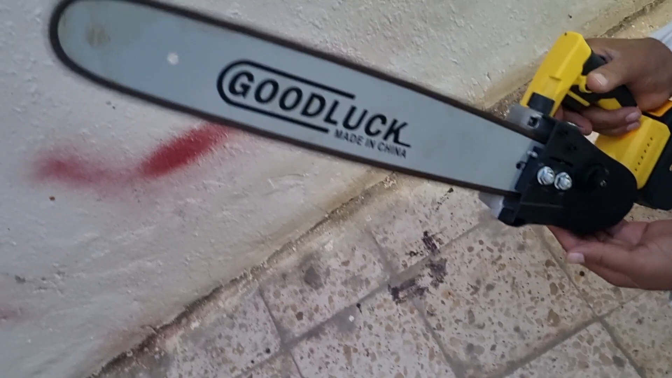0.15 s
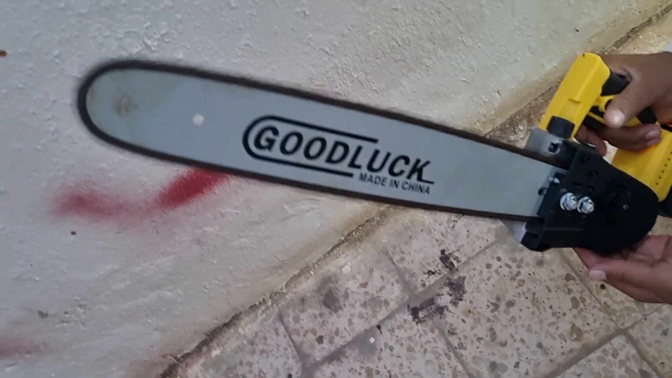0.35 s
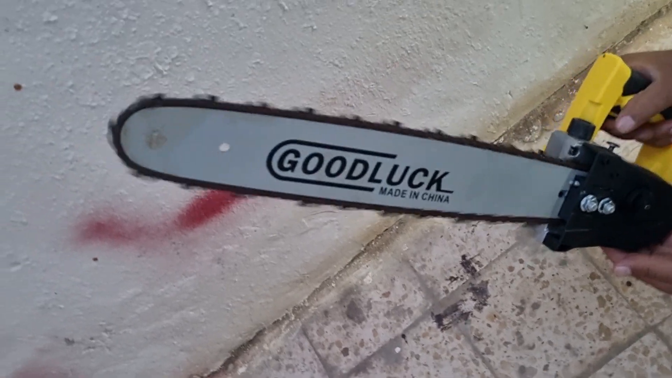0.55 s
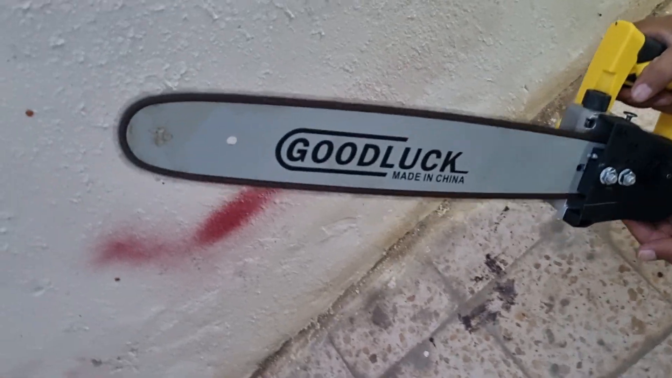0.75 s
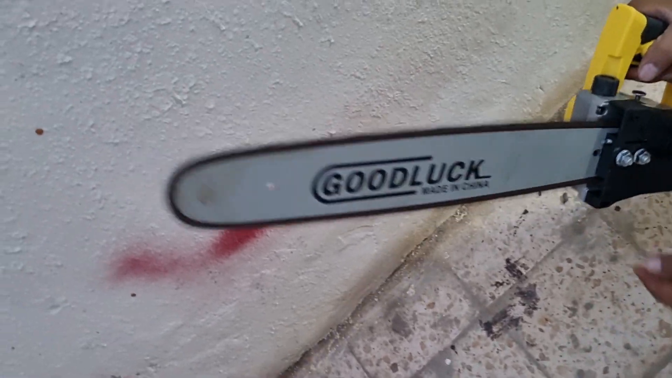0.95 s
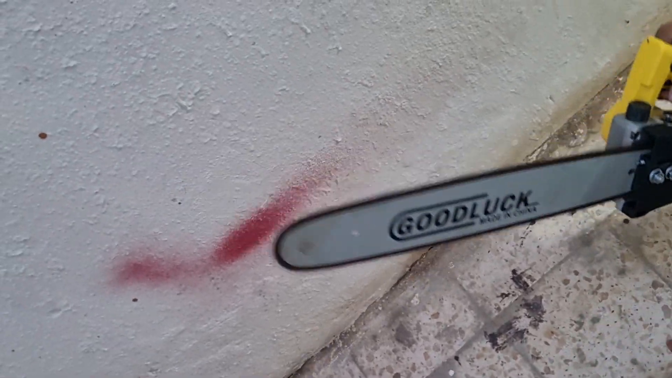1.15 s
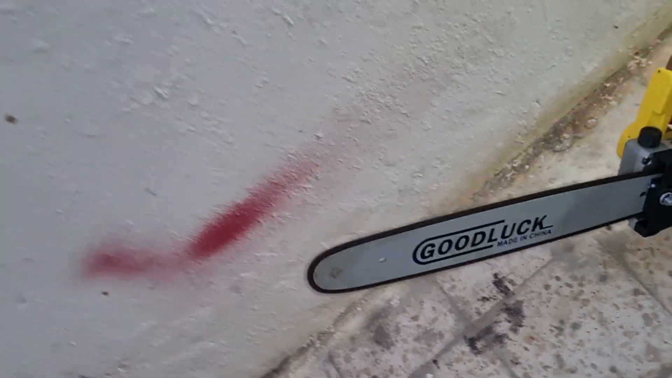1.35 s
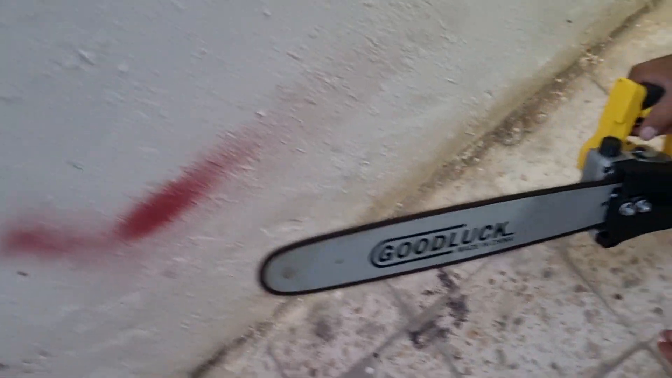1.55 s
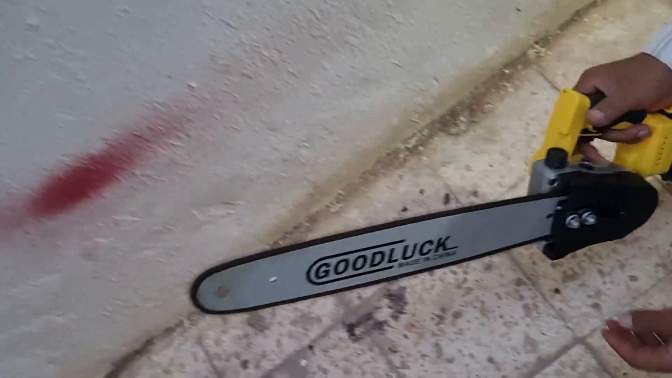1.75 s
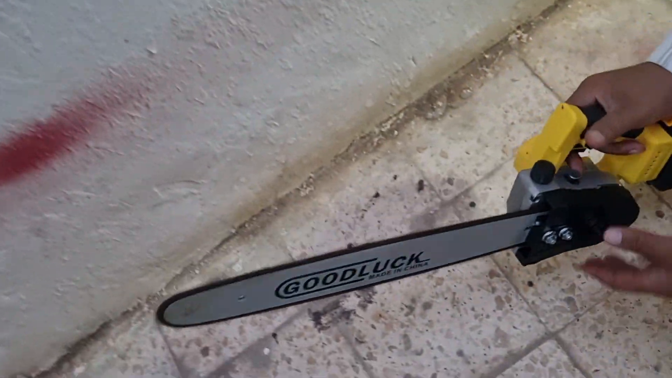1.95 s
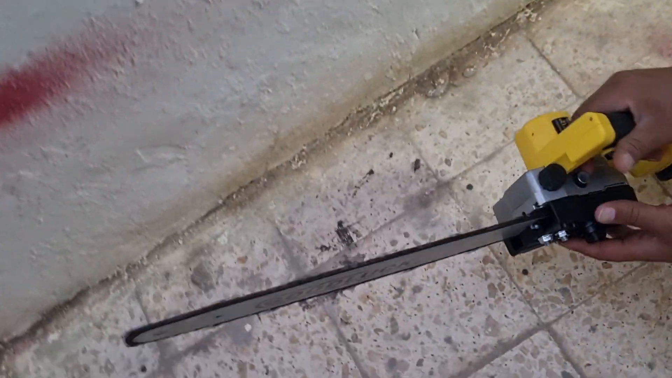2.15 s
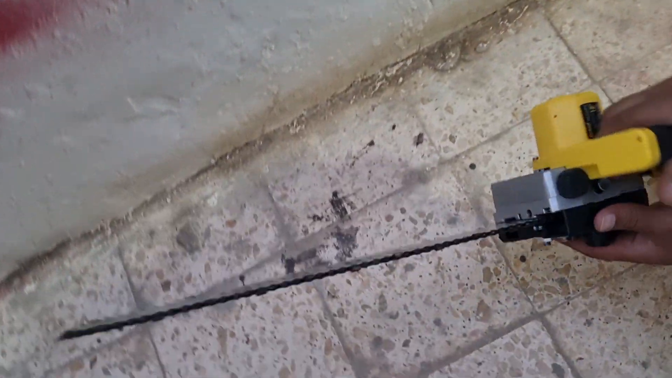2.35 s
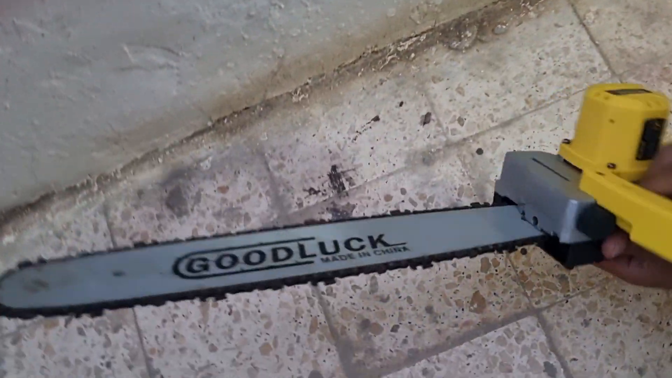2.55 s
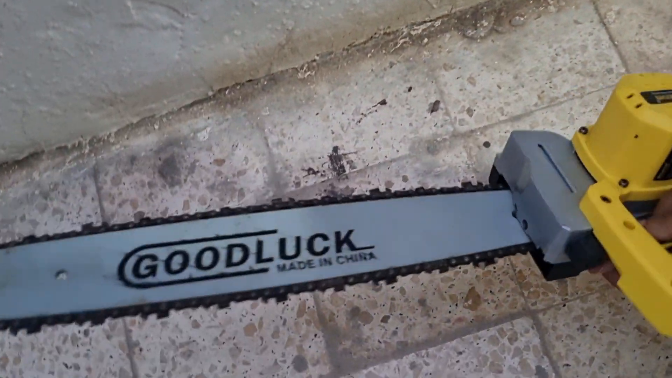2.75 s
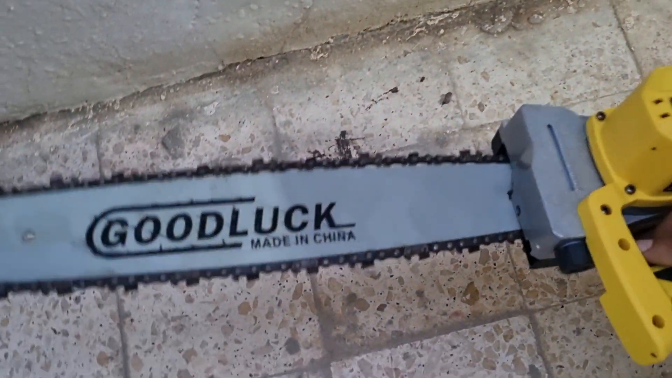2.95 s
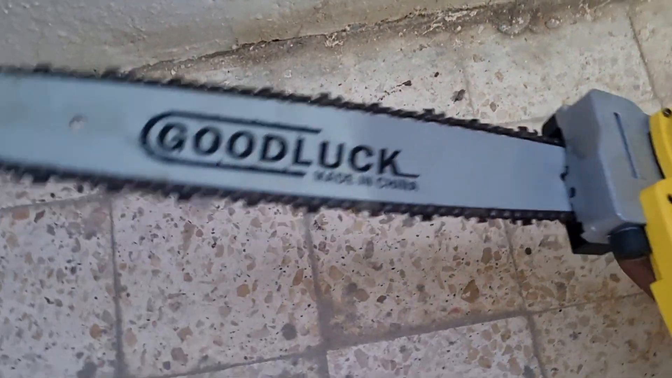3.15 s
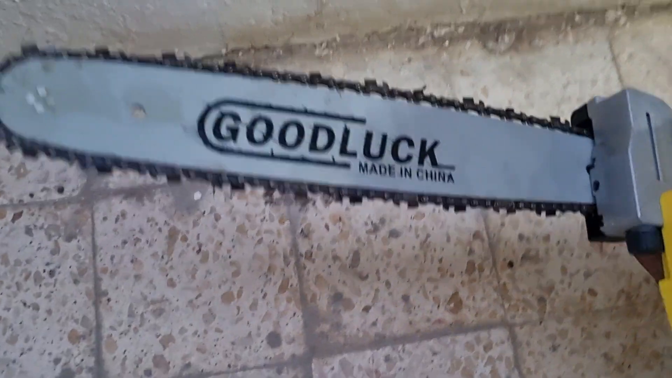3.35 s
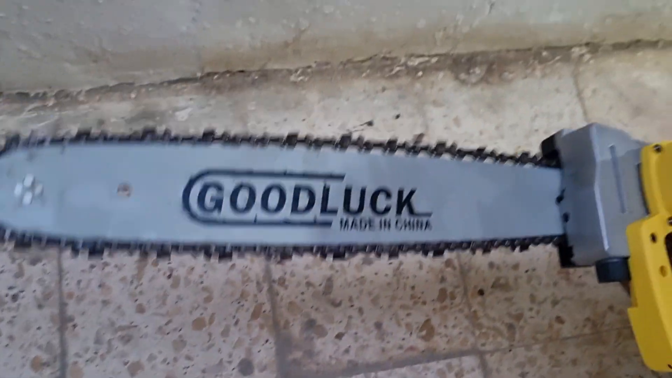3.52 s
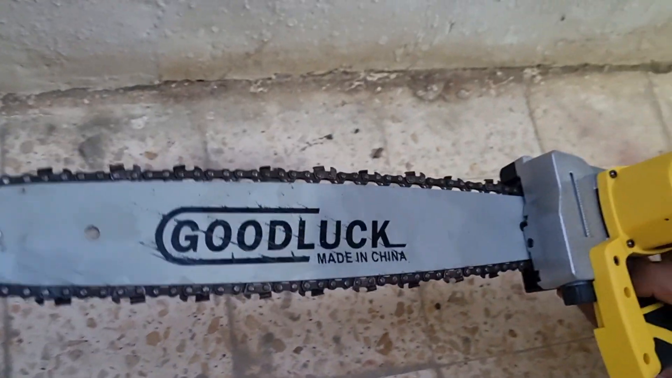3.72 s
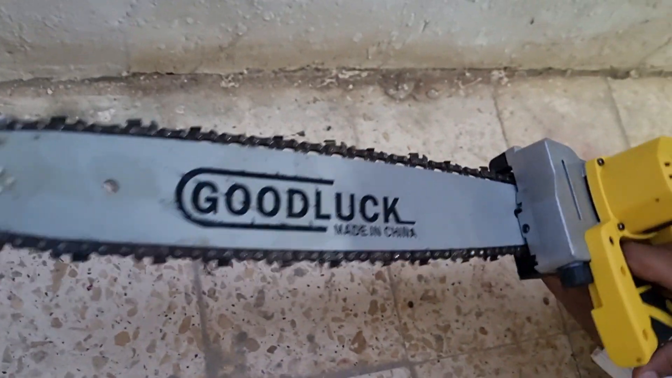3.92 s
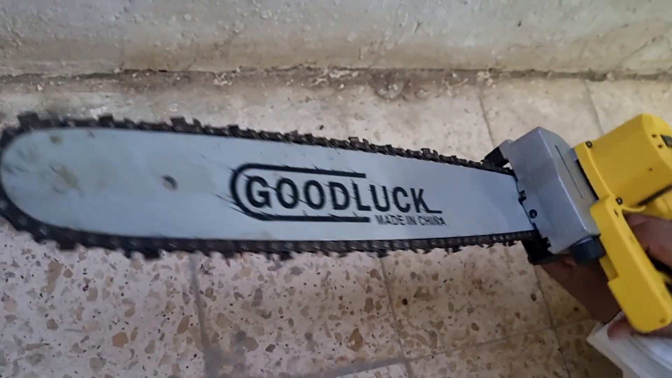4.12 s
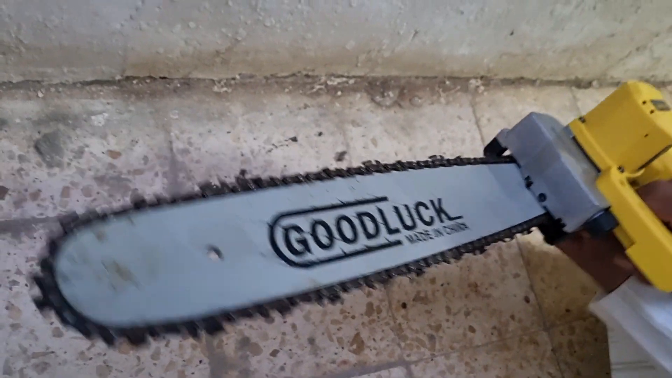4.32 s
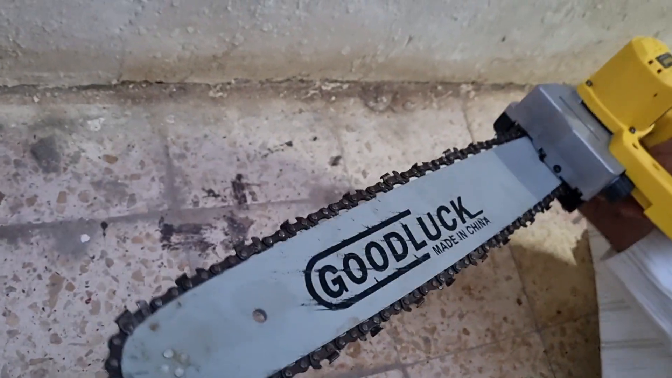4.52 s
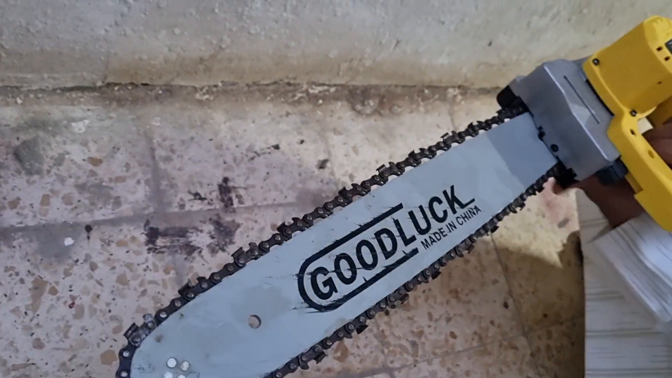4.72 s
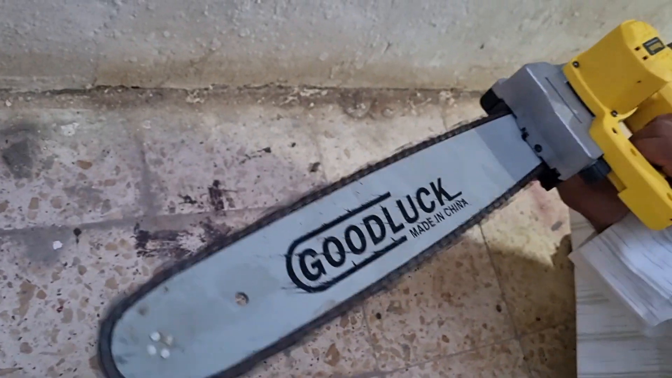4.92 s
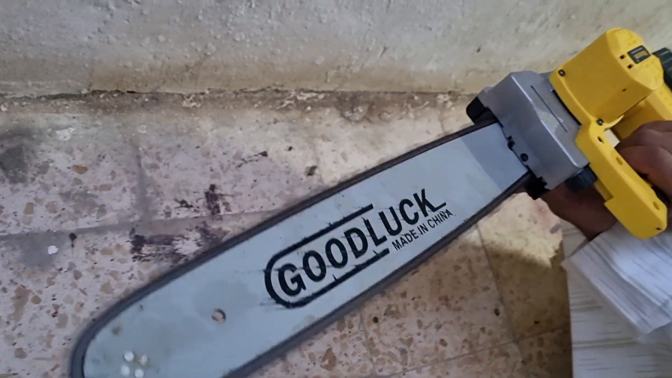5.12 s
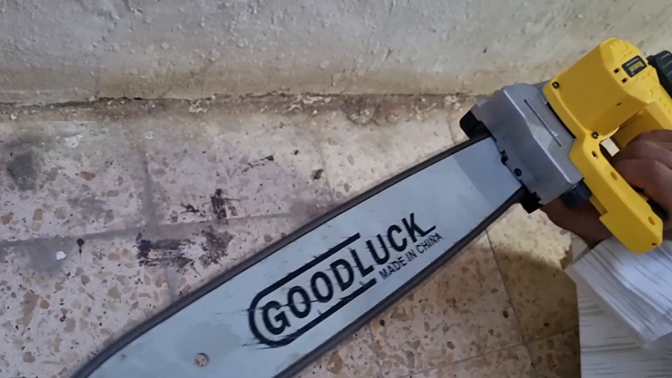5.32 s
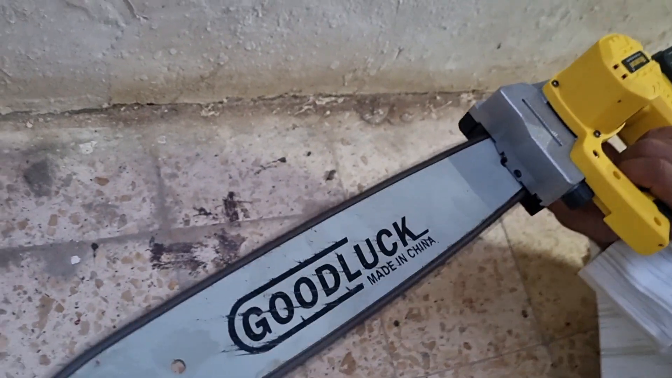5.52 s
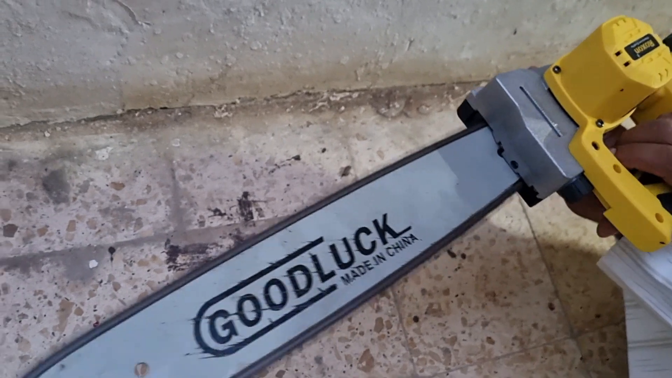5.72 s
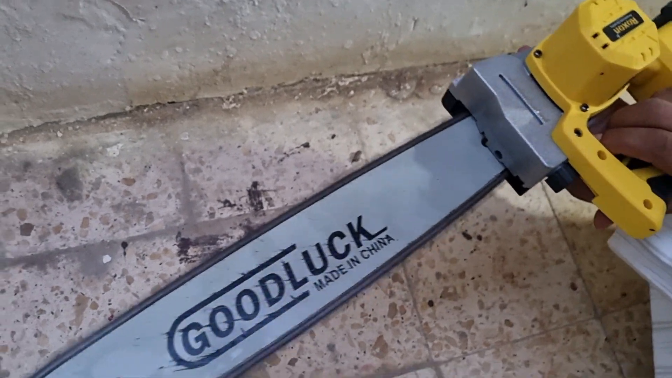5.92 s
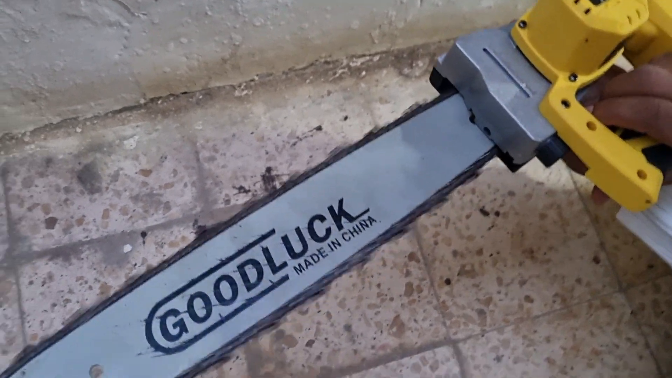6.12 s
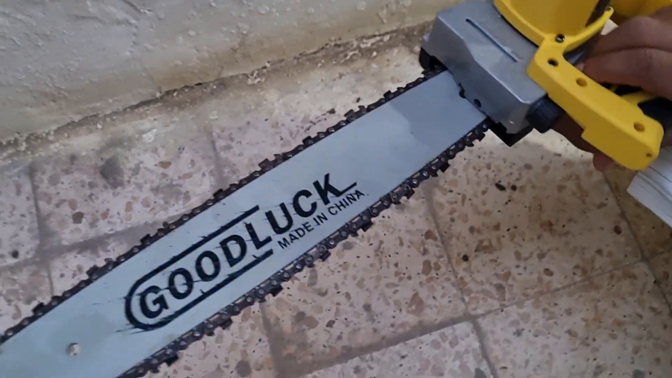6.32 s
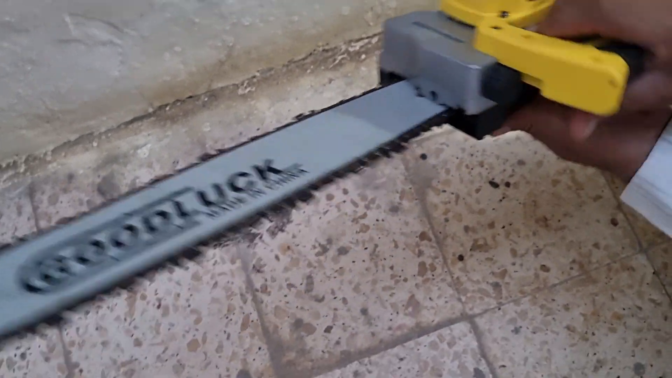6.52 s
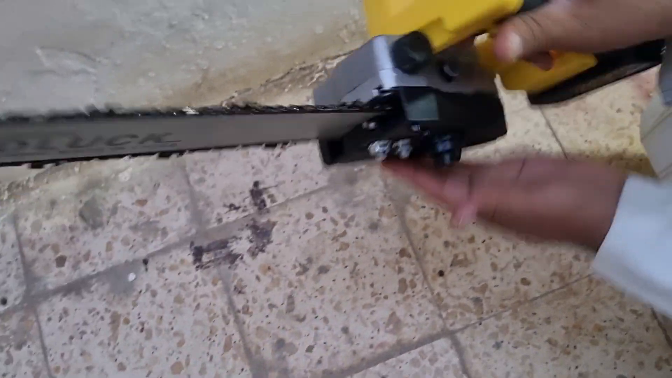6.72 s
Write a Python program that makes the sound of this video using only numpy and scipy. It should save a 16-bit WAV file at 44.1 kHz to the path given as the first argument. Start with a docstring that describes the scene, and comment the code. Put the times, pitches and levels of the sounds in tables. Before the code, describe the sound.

Close to the microphone, an electric chainsaw spins its chain freely in three short bursts, each a hissing metallic rattle that slows and dulls as it coasts. The first two come back to back, with the slack chain clacking against the bar. A quiet gap of faint hand rubbing and plastic clicks comes before the third. A tiled floor and wall add slight reverberation, and a distant machine hums low throughout.

```python
"""A cordless chainsaw rattles freely in three trigger bursts, close to a stereo pair over a tiled floor.
The first burst is already running. Links strike the sprocket and the steel bar over a faint gear whine,
then coast down; the slack chain clacks and sets the bar ringing. Before the last burst the saw is
turned from cover up to motor up: hands rustle, trigger and housing click. Wall and tiles return a
short tail, and a distant machine hums low in the room."""
import sys
import numpy as np
from scipy import signal
from scipy.fft import rfft, irfft
from scipy.io import wavfile
from scipy.ndimage import uniform_filter1d

SR = 44100
rng = np.random.default_rng(int(sys.argv[2]) if len(sys.argv) > 2 else 0)


def store_pcm(level_fs):
    """Save levels as 16-bit WAV."""
    pcm = np.round(np.clip(level_fs, -1, 1) * 32767).astype(np.int16)
    wavfile.write(sys.argv[1], SR, np.atleast_2d(pcm).T)


N = 298557
TIME = np.arange(N) / SR
TURN_S = 3  # from here on the saw lies motor up

# trigger bursts: press t/s, release t/s, top shaft speed/(turns/s), spin-up time constant/s, coast/s,
# rattle level/dB, low clatter/dB and hiss/dB against the mid band, lift of the bar's ring/dB
BURSTS = [(-1.5, .06, 238, .3, .615, -19, -6.4, -.1, -2.3), (.62, 1.73, 249, .315, .62, -19.8, -9, .2, .5),
          (4.92, 5.64, 246, .205, .61, -18.6, -9.3, 2, 0)]
# slack chain on the sprocket: t/s, relative level/dB, decay/s, tilt/(dB/octave), main ring f/Hz
CLACKS = [(.630, -25.5, .0055, 9, 4500), (2.076, -22.5, .008, 12, 5000), (2.324, -47, .004, 1, 3200),
          (2.339, -42.5, 0.009, -7.5, 4450), (2.364, -43, .006, -9.5, 4600), (2.381, -51, .004, -10, 1600),
          (2.398, -52, 0.008, -9, 4500), (4.920, -37, .005, 4, 2400), (4.927, -29.5, .025, -1, 2200),
          (4.942, -23, .003, 10.5, 2400), (6.241, -45, .0015, 5, 12000), (6.2586, -34.5, 0.003, -2, 4600),
          (6.2902, -37.5, 0.0028, -1.5, 4850)]


def amp(db):
    """Decibels to gain."""
    return 10 ** (np.asarray(db) / 20)


def unit(x):
    """Scales to rms 1."""
    return x / np.sqrt(np.mean(x ** 2) + 1e-20)


def by_hz(points, hz, column=1):
    """Reads one column of a table on a log-frequency axis."""
    points = np.asarray(points, float)
    return np.interp(np.log(hz + 1), np.log(points[:, 0] + 1), points[:, column])


def by_burst(t):
    """The columns of the latest burst at each time."""
    rows = np.asarray(BURSTS, float)
    return rows[np.searchsorted(rows[:, 0], t) - 1].T


def peak(hz, centre, width):
    """Bell of a resonance, 1 at its centre."""
    return 1 / (1 + (2 * (hz - centre) / width) ** 2)


def wander(cutoff_hz):
    """Smooth random drift of rms 1."""
    hz = np.fft.rfftfreq(N, 1 / SR)
    return unit(irfft(rfft(rng.standard_normal(N)) / (1 + (hz / cutoff_hz) ** 4), N))


def coloured(x, points, tilt_db=0, ring_hz=1000, ring_db=0):
    """Filters by a tilted spectrum with one resonance raised."""
    hz = np.fft.rfftfreq(x.shape[-1], 1 / SR)
    octaves = np.log2((hz + 500) / 4000)
    gain = amp(by_hz(points, hz) + tilt_db * octaves + ring_db * peak(hz, ring_hz, 800))
    return irfft(rfft(x) * unit(gain), x.shape[-1])


def paired(z, coherence):
    """Makes two unrelated spectra partly alike, as at the left and right microphones."""
    return np.array([z[0], coherence * z[0] + np.sqrt(1 - coherence ** 2) * z[1]])


def shaft_speed(coast_curve=1.17):
    """Turns per second: the motor climbs while the trigger is held, then friction slows it to rest."""
    speed = np.zeros(N)
    for press, release, top, spin_up, coast, *_ in BURSTS:
        start = np.interp(press, TIME, speed)
        driven = start + (top - start) * np.tanh((np.minimum(TIME, release) - press) / spin_up)
        coasting = np.clip(1 - (TIME - release) / coast, 0, 1) ** coast_curve
        speed = np.where(TIME < press, speed, driven * coasting)
    return speed


def load(speed, full_turns_per_s2=282):
    """Pull on the chain, 0-1, from the shaft's acceleration."""
    return np.clip(uniform_filter1d(np.gradient(speed) * SR, size=3000) / full_turns_per_s2, 0, 1)


def links(speed, links_per_turn=2, spread_db=3, ring_s=.0008, slide=.85, slap_db=.66, tick_db=-9):
    """Each drive link strikes sprocket and bar nose; between strikes the chain slides in its groove."""
    passed = np.cumsum(speed * links_per_turn) / SR
    strikes = np.zeros(N)
    for place in (0, .5):
        crossing = np.diff(np.floor(passed + place + .12 * wander(300)), prepend=0) > 0
        strikes += crossing * amp(spread_db * rng.uniform(-1, 1, N))
    force = signal.lfilter([1], [1, -np.exp(-1 / (ring_s * SR))], strikes) + slide
    # tight and slack stretches come round with each lap of the chain
    force *= (1 + .06 * np.sin(2 * np.pi * passed / 16)) * amp(slap_db * wander(70))
    force /= np.sqrt(uniform_filter1d(force ** 2, size=2205))
    # cutters nick the rails: a dense fizz at full speed, separate ticks as the chain slows
    tick_rate = 9 * (speed + 20) * (speed / speed.max() + .1)
    ticks = (rng.random(N) < tick_rate / SR) * rng.choice([-1, 1], (2, N)) * np.sqrt(SR / tick_rate)
    return force * (rng.standard_normal((2, N)) + amp(tick_db) * ticks)


def flares(t, hz):
    """Brief swells of single resonances of the rattle, in dB over frames and bins."""
    # t/s, half length/s, f/Hz, width/Hz, lift/dB
    swells = [(1.03, .08, 4600, 900, 3), (1.46, .14, 4970, 260, 8), (1.68, .09, 3900, 700, 3),
              (1.74, .13, 1130, 300, 6), (5.17, .06, 1430, 260, 8), (5.42, .15, 4110, 200, 3.5),
              (5.93, .14, 4700, 500, 4.5)]
    return sum(db * np.outer(np.exp(-((t - s) / length) ** 2), peak(hz, f, width))
               for s, length, f, width, db in swells)


def burst_colour(t, hz, body, bar_hz=5200, bar_width_hz=2200):
    """Each burst's own share of clatter, hiss and bar ring, in dB, with the mid band as reference."""
    *_, clatter, hiss, bar = by_burst(t)
    bands_hz = [(700, 1800), (1800, 6000), (7000, 15500)]
    low, mid, high = (20 * np.log10(np.linalg.norm(body[(hz > a) & (hz < b)])) for a, b in bands_hz)
    clatter_db = np.outer(clatter - low + mid, by_hz([(1400, 1), (2200, 0)], hz))
    hiss_db = np.outer(hiss - high + mid, by_hz([(5000, .0022), (8000, .85)], hz))
    bar_db = np.outer(bar, peak(hz, bar_hz, bar_width_hz))
    return clatter_db + hiss_db + bar_db - mid


def speed_colour(t, hz, speed, coast_ring_db):
    """Change of the rattle in dB: louder under pull, duller and more ringing as the chain coasts."""
    # lift from the pull of the accelerating motor: f/Hz, level/dB
    pull_colour = [(300, 1.5), (1000, 1), (1500, 2.8), (1900, 1.5), (2400, 4.5), (4600, 3.4), (8000, 1.9),
                   (15000, 1.9)]
    # change as the chain nears rest: f/Hz, level/dB
    slow_colour = [(300, .5), (1300, .3), (2600, -1), (4600, -1.6), (8000, -5.2), (15000, -5.4)]
    # bands in which the loaded sprocket shakes the chain: multiple of shaft rate, width/Hz, lift/dB
    growl = [(8.3, 220, 2.5), (14, 220, 6)]
    shaft_hz = np.interp(t, TIME, speed)[:, None]
    pull = np.interp(t, TIME, load(speed))[:, None]
    pace = shaft_hz / speed.max()
    growl_db = pull * pace * sum(db * peak(hz, k * shaft_hz, width) for k, width, db in growl)
    pull_db = pull * pace ** .17 * by_hz(pull_colour, hz)
    slow_db = (1 - pace) * (by_hz(slow_colour, hz) + (1 - pull) * coast_ring_db)
    return growl_db + pull_db + slow_db


def rattle(drive, speed, colour, modes, image, gain_db, patchy_db, coast_ring, settle_turns_per_s=15):
    """Link strikes ring bar and housing, louder with speed, as heard from one side of the saw."""
    hz, t, z = signal.stft(drive, SR, nperseg=1024, noverlap=768)
    coherence, phase, balance_db = (by_hz(image, hz, column) for column in (1, 2, 3))
    z = paired(z.transpose(0, 2, 1), coherence)
    z *= np.array([amp(balance_db / 2), amp(-balance_db / 2) * np.exp(-1j * phase)])[:, None]
    ring_db = sum(db * peak(hz, f, width) for f, width, db in modes)
    body = amp(by_hz(colour, hz) + ring_db)
    z *= body / np.sqrt(np.mean(abs(z) ** 2, (0, 1)))
    z *= amp(burst_colour(t, hz, body) + speed_colour(t, hz, speed, coast_ring * ring_db))
    # the whipping chain shifts energy between resonances
    patches = uniform_filter1d(rng.standard_normal(z.shape[1:]), size=12, axis=0)
    patches = unit(uniform_filter1d(patches, size=5, axis=1))
    z *= amp(patchy_db * patches + flares(t, hz))
    sound = signal.istft(z.transpose(0, 2, 1), SR, nperseg=1024, noverlap=768)[1][:, :N]
    jumping = speed ** 2 / (speed ** 2 + settle_turns_per_s ** 2)  # slow links only slide
    _, _, top_speed, _, _, burst_db, *_ = by_burst(TIME)
    return sound * jumping * amp(burst_db + gain_db) * (speed / top_speed) ** .94


def chain(speed):
    """The running chain, close to the microphones: first sprocket cover up, then motor up."""
    # broad spectrum of the rattle from each side: f/Hz, relative level/dB
    cover_colour = [(100, -35.5), (300, -21), (600, -19.5), (1000, -10.5), (1300, -8), (1850, -1.4),
                    (2800, .7), (4000, .3), (5200, .8), (6500, -4), (8500, -9), (10500, -9.3), (12500, -5),
                    (15800, -8.7)]
    motor_colour = [(100, -21), (300, -25), (600, -19.5), (850, -9), (1250, -9), (2200, 1), (3000, 6),
                    (4600, 4), (6500, -6), (8500, -16.5), (10500, -15.5), (12000, -11.5), (15800, -15.5)]
    # resonances of bar and housing from each side: f/Hz, width/Hz, lift/dB
    cover_modes = [(761, 60, 7), (970, 44, 3.5), (1490, 36, 12), (1623, 60, 7), (2056, 110, 5.7),
                   (3090, 270, 2.3), (4000, 100, 4.5), (5010, 190, 1), (5820, 280, -3), (9250, 400, 1.5)]
    motor_modes = [(816, 63, 5.8), (990, 35, 4.5), (1480, 33, 2), (1640, 60, 7), (2015, 125, 10.5),
                   (2325, 45, 4), (2450, 60, 4.5), (2890, 90, 3.2), (3835, 93, 5.4), (4130, 140, 7),
                   (4950, 270, 1.5), (5260, 200, 2.5), (9300, 340, 3.3)]
    # each side at the microphone pair: f/Hz, coherence, left lead/rad, left minus right/dB
    cover_image = [(300, 0.18, -0.5, -6), (550, 0.98, -1.6, -0.5), (998, .5, -1.6, -6.5),
                   (1500, 0.75, -2.5, -3), (2270, 0.89, -3.5, -3.5), (2830, .3, -4.5, -6),
                   (3560, 0.588, -4, -4), (4860, .5, -5, -6), (7200, 0.23, -5, 1), (11500, .12, -4.5, -6.5),
                   (15000, .05, -3.5, -3.5)]
    motor_image = [(300, 0.59, -2, 0), (750, 0.27, -0.4, -8), (1080, 0.31, -1.5, -3.5),
                   (1363, 0.22, 2.9, -4), (1600, 0.19, 1, -2), (1890, 0.52, .65, -3), (2360, 0.65, 0, -3.5),
                   (2960, 0.55, 2, -5), (4300, 0.62, 2.5, -7.5), (5430, 0.41, 2.5, -1.5),
                   (7960, 0.33, 1.1, 2), (12000, 0.26, 1, -7), (15000, .1, 2, -3.5)]
    drive = links(speed)
    cover_up = rattle(drive, speed, cover_colour, cover_modes, cover_image,
                      gain_db=1, patchy_db=1.7, coast_ring=.21)
    motor_up = rattle(drive, speed, motor_colour, motor_modes, motor_image,
                      gain_db=0, patchy_db=1.5, coast_ring=.4)
    return np.where(TIME < TURN_S, cover_up, motor_up)


def motor(speed, flutter=.004, rough=.7, strain_db=11):
    """Unbalance hums near full speed; the gears whine loudest while they pull the chain up to speed."""
    # shaft unbalance: multiple of shaft rate, level/dB at full speed with the cover up
    unbalance = [(1, -45), (2, -48), (4, -51)]
    # gear mesh: multiple of shaft rate, relative level/dB cover up, relative level/dB motor up
    gears = [(8, -47, -45), (11, -47, -47), (14, -37.5, -44), (17, -39.5, -39), (21, -42, -48),
             (26, -42, -50)]
    turns = np.cumsum(speed * (1 + flutter * wander(39.32))) / SR
    pace = speed / speed.max()
    motor_up = np.clip(TIME - TURN_S, 0, 1)
    def tone(multiple):
        flicker = 1 + rough * np.array([wander(25), wander(25)])
        cycles = multiple * turns + rng.random() + np.array([[0], [multiple / 70]])  # right leads
        return np.sqrt(2) * np.sin(2 * np.pi * cycles) * flicker
    hum = sum(amp(db - 6.7 * motor_up) * tone(k) for k, db in unbalance)
    whine = sum(amp(cover_db + (motor_db - cover_db) * motor_up) * tone(k)
                for k, cover_db, motor_db in gears)
    strain = pace ** 2 * amp(strain_db * load(speed))
    return hum * pace ** 5 + whine * strain * amp([[-1.5], [1.5]])


def walls(x):
    """Wall and tiles return a short tail that lasts longest in the midrange."""
    # reverberation: f/Hz, t60/s
    decay = [(200, 0.13), (2000, 0.3), (6000, 0.17), (15000, 0.15)]
    hz, t, z = signal.stft(rng.standard_normal((2, SR // 2)), SR, nperseg=256)
    envelope = amp(-60 * t / by_hz(decay, hz)[:, None]) * (t > .004)
    tail = signal.istft(z * envelope, SR, nperseg=256)[1]
    return signal.fftconvolve(x, tail / np.linalg.norm(tail[0]), axes=1)[:, :N]


def room_tone(waver=.35, drift_hz=1.2, drone_hz=58.5, drone_db=-52.3, drone_waver_db=2.8):
    """A dull wash all round the microphones and the wavering hum of a distant machine."""
    # spectrum of the wash: f/Hz, relative level/dB
    colour = [(20, -11.5), (42, -2.5), (75, 1.5), (105, 3), (140, -2.5), (230, 2), (330, -2.5), (500, 1),
              (750, -5), (1200, -12.5), (2000, -17), (4100, -20), (5500, -31.5), (9000, -46.5)]
    # likeness of the wash at the two microphones: f/Hz, coherence
    coherence = [(60, 0.53), (150, 0.87), (300, 0.42), (600, 0.0045), (1200, 0), (8000, 0)]
    # course of the wash: t/s, level/dB
    wash_levels = [(0, -42), (2.5, -44), (3.3, -41.5), (4.5, -42.5), (5.2, -42), (6.4, -45.5), (6.77, -43)]
    # steadier lines of the hum: f/Hz, level/dB
    hum_lines = [(29, -58), (89.5, -53), (118, -55), (240, -55.5), (461, -60)]
    # swells of the drone, the hum's strongest line: t/s, half length/s, lift/dB
    swells = [(.38, .13, 5), (1.15, .06, 9), (1.5, .1, 6), (2.13, .14, 10), (4.56, .14, 11), (5.92, .15, 6)]
    hz = np.fft.rfftfreq(N, 1 / SR)
    spectrum = paired(rfft(rng.standard_normal((2, N))), by_hz(coherence, hz))
    wash = unit(irfft(spectrum * amp(by_hz(colour, hz)), N))
    wash *= amp(np.interp(TIME, *np.transpose(wash_levels)))
    def tone(f):
        return np.sqrt(2) * np.sin(2 * np.pi * np.cumsum(f + drift_hz * wander(3.96)) / SR)
    hum = sum(amp(db) * tone(f) * (1 + waver * wander(11)) for f, db in hum_lines)
    swell_db = sum(db * np.exp(-((TIME - s) / length) ** 2) for s, length, db in swells)
    swell_db += drone_waver_db * wander(3)
    return wash + hum + tone(drone_hz) * amp(drone_db + swell_db)


def knocks(rows, colour, ring_db, rise_s=.0004, lead_samples=256):
    """Short contacts, right of centre: a fast rise and a quickly damped, dense ring."""
    out = np.zeros((2, N))
    t = np.maximum(np.arange(4096) - lead_samples, 0) / SR
    for s, db, decay, tilt_db, ring_hz in rows:
        blow = rng.standard_normal((2, len(t))) * np.exp(-t / decay) * (1 - np.exp(-t / rise_s))
        part = out[:, round(s * SR) - lead_samples:][:, :len(t)]
        part += amp(db) * coloured(blow, colour, tilt_db, ring_hz, ring_db)[:, :part.shape[1]]
    return out * amp([[-3], [3]])


def chain_clacks():
    """The slack chain knocks against the sprocket as it starts and stops."""
    # spectrum of a clack: f/Hz, relative level/dB
    colour = [(200, -16), (1200, -9), (2100, -1.5), (3000, -3.5), (4100, -3), (5000, -6), (6200, -5),
              (9000, -17.5), (12500, -14.5), (15800, -26.5)]
    return knocks(CLACKS, colour, ring_db=7)


def bar_clinks(speed, gain_db=-1.5, taut_damping_db=16, rise_s=.00039):
    """Slack links drop on to the bar and leave it ringing briefly; a taut, driven chain damps it."""
    # modes of the steel bar: f/Hz, relative level/dB, t60/s
    modes = [(2066, -16, 0.11), (3990, -19, 0.05), (4400, -12, .07), (4940, -11.5, 0.051), (7040, -27, .05)]
    out = np.zeros((2, N))
    t = np.arange(SR // 5) / SR
    pull = load(speed)
    for s, db, *_ in CLACKS:
        start = round(s * SR)
        phases = rng.random((len(modes), 2, 1))
        ring = sum(amp(mode_db - 60 * t / t60) * np.sin(2 * np.pi * (hz * t + phase))
                   for (hz, mode_db, t60), phase in zip(modes, phases))
        gain = amp(db + gain_db - taut_damping_db * pull[start])
        out[:, start:][:, :len(t)] += gain * ring * np.minimum(t / rise_s, 1)
    return out


def hand_rustle(taper=.9):
    """Sleeve and hand rub the housing, swelling and fading with each stroke as the saw is turned."""
    # strokes: start t/s, length/s, level/dB
    strokes = [(2.4, .35, -61), (2.62, .46, -61.5), (3.16, .12, -68), (3.27, .08, -60), (3.3, .29, -60),
               (3.7, .2, -69), (4.0, .25, -61.5), (4.23, .25, -66.5)]
    # spectrum of the friction: f/Hz, relative level/dB
    colour = [(1000, -25), (4000, -3), (6000, 2), (9000, -3.5), (12500, -5), (15800, -7)]
    power = np.zeros(N)
    for s, length, db in strokes:
        arch = np.sin(np.pi * np.clip((TIME - s) / length, 0, 1))
        power += (amp(db) * arch ** taper) ** 2
    return coloured(unit(rng.standard_normal((2, N))), colour) * np.sqrt(power)


def housing_clicks():
    """Trigger and plastic housing click under the hands."""
    # clicks: t/s, relative level/dB, decay/s, tilt/(dB/octave), main ring f/Hz
    clicks = [(2.518, -46.5, 0.01, 3.5, 1490), (2.86, -64.5, .01, 11, 7500),
              (4.621, -55, 0.0036, -0.5, 5300), (4.676, -56, .015, 7, 6900),
              (4.8455, -29, 0.002, 5.5, 6500), (6.690, -37.5, 0.0038, 0.5, 4000),
              (6.718, -42, .003, 8, 6500)]
    # spectrum of a click: f/Hz, relative level/dB
    colour = [(200, -10), (900, 1), (1500, 10), (2300, 7), (4000, 6), (6500, -5), (9000, -7), (12500, -6),
              (15800, -8)]
    return knocks(clicks, colour, ring_db=13)


def scene():
    """The saw and the hands on it close up, the tiled room behind them."""
    speed = shaft_speed()
    saw = chain(speed) + motor(speed)
    contacts = chain_clacks() + housing_clicks() + bar_clinks(speed)
    reflections = amp(-10.5) * walls(saw) + amp(-1.5) * walls(contacts)
    return saw + amp(6.5) * contacts + reflections + hand_rustle() + room_tone()


def record(dry, ceiling=.95, edge_hz=15950):
    """Soft overload of the tallest spikes, then the recorder's band limit."""
    limited = dry / (1 + (dry / ceiling) ** 6) ** (1 / 6)
    lowpass = signal.firwin(511, edge_hz, window=("kaiser", 9), fs=SR)
    return signal.oaconvolve(limited, lowpass[None], "same")


dry = scene()
out = record(dry)
store_pcm(out)
```